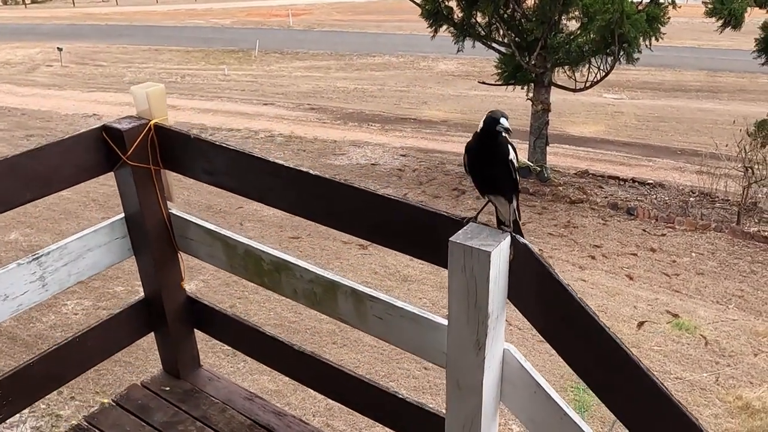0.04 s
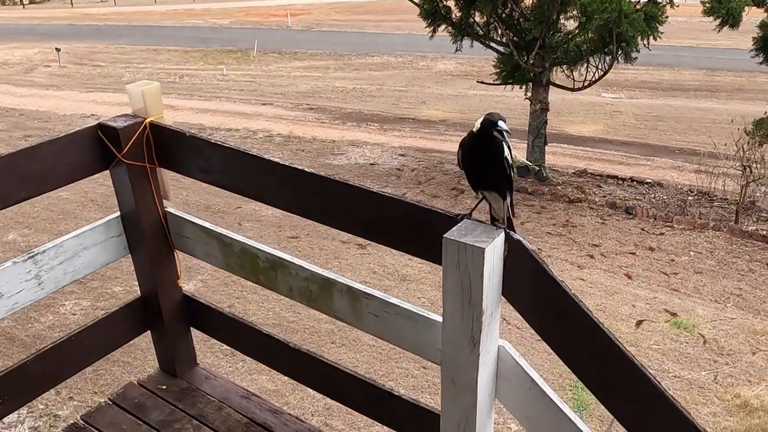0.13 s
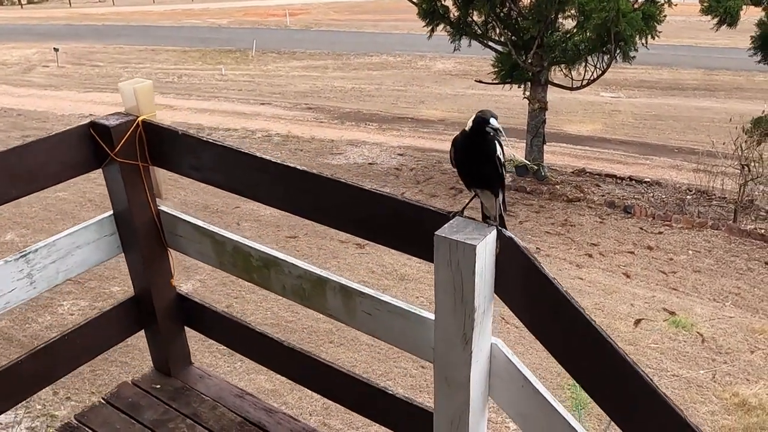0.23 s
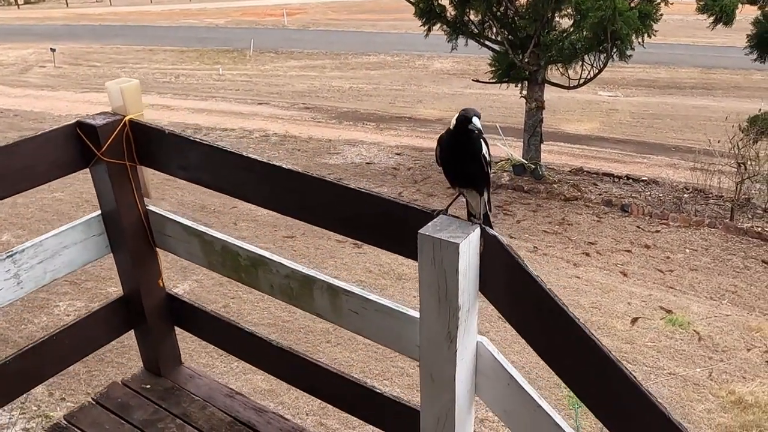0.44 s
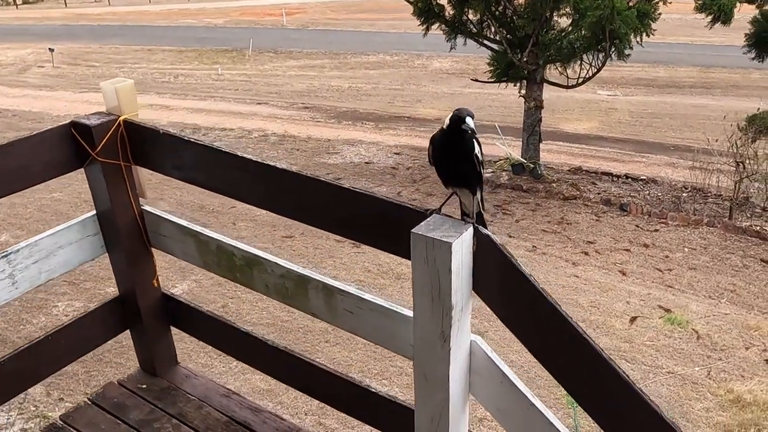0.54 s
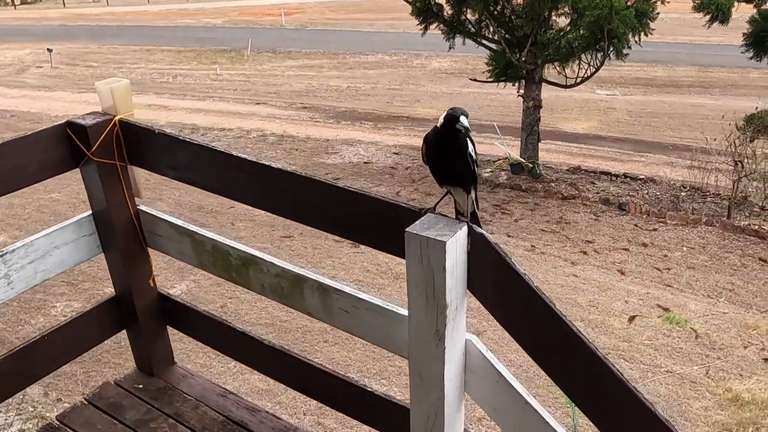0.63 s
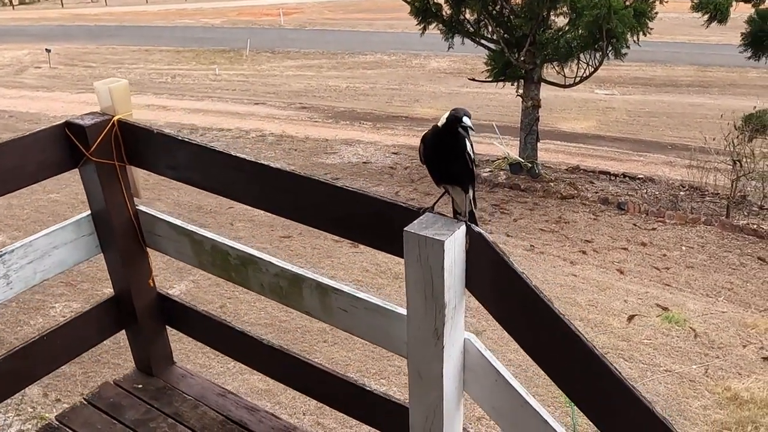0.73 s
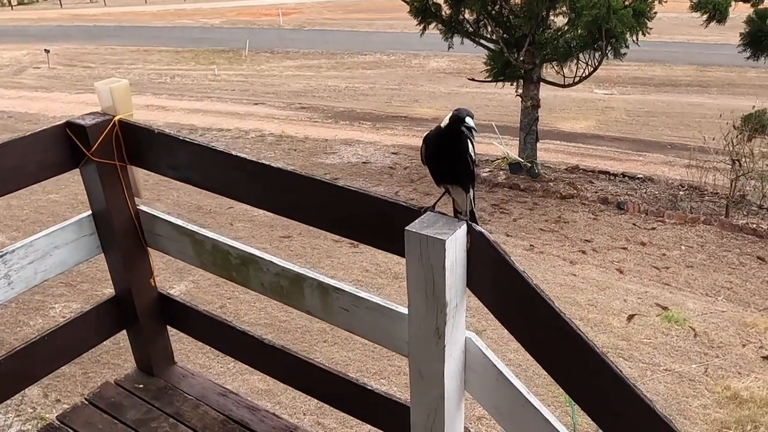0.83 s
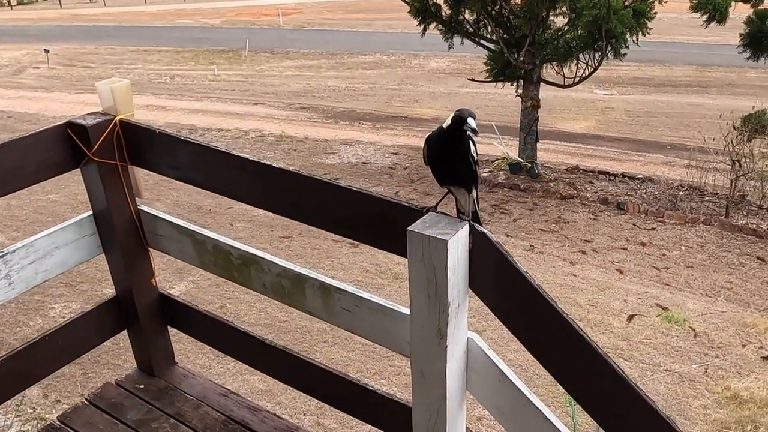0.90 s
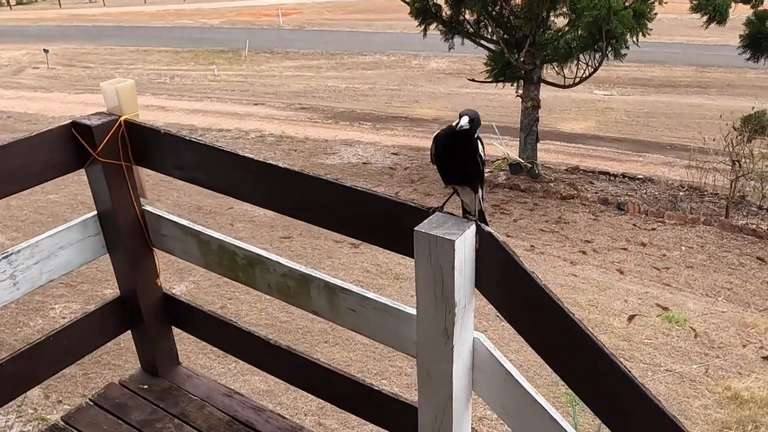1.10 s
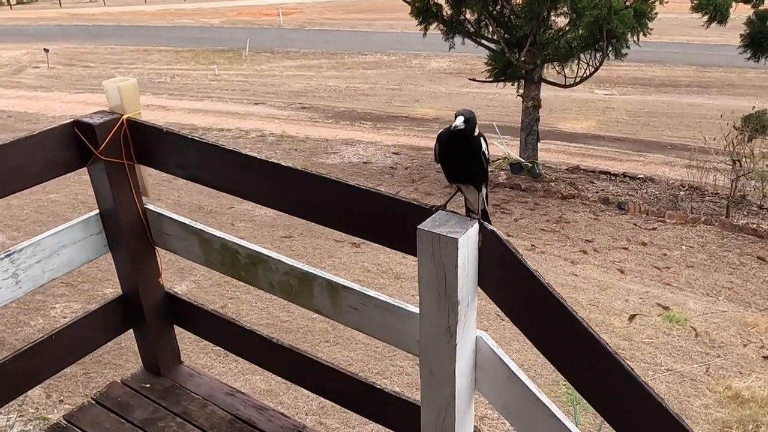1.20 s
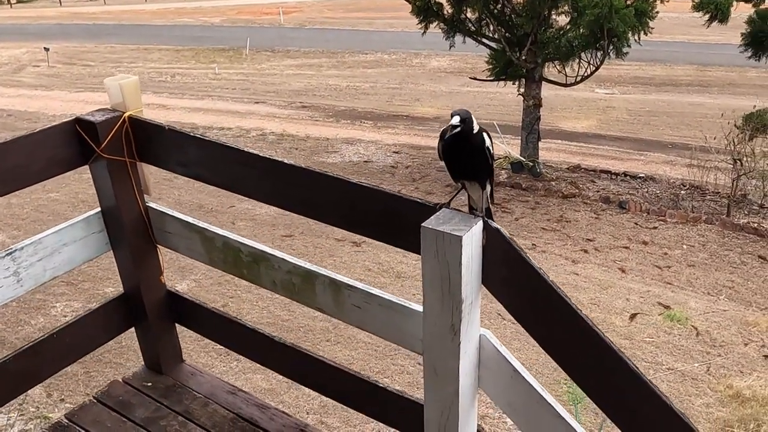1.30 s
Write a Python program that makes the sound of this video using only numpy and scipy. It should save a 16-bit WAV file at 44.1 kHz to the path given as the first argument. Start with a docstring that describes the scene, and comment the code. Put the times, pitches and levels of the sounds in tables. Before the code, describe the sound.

A magpie gives two loud, harsh, rattling squawks close by on an outdoor balcony

```python
"""On a balcony, a magpie on the rail squawks twice, close to a phone with a single microphone.
Its voice is a stack of harmonics that climbs in pitch and drops at the end; a slower rattle in
the syrinx (the bird's voice box) shakes its pitch and level. House wall and deck echo it.
Far birds are thin gliding sine whistles; the open-country air is coloured noise in flickering bands."""
import sys
import numpy as np
from scipy import signal
from scipy.fft import rfft, irfft, next_fast_len
from scipy.io import wavfile
from scipy.ndimage import uniform_filter1d

SR = 44100
rng = np.random.default_rng(int(sys.argv[2]) if len(sys.argv) > 2 else 0)


def store_wav(level_fs):
    """Save 16-bit WAV to argv[1]."""
    pcm = np.round(np.clip(np.atleast_2d(level_fs), -1, 1) * 32767)
    wavfile.write(sys.argv[1], SR, pcm.T.astype(np.int16))


N = 59535  # samples, 1.35 s


def undb(db):
    """Turn decibels into a plain multiplier."""
    return 10 ** (np.asarray(db) / 20)


def colour(x, points):
    """Shape a spectrum by (frequency [Hz], level [dB]) points, joined along a log-frequency axis."""
    size = next_fast_len(N + 4096)
    point_hz, point_db = np.array(points, float).T
    f = np.maximum(np.arange(size // 2 + 1) * SR / size, 1)
    gain = undb(np.interp(np.log(f), np.log(point_hz), point_db))
    return irfft(rfft(x, size) * gain, size)[..., :N]


def walk(rate):
    """Smooth random wander of spread 1: noise averaged twice over 1/rate seconds."""
    width = max(int(SR / rate), 2)
    wander = uniform_filter1d(uniform_filter1d(rng.standard_normal(N), width), width)
    return wander / wander.std()


def curve(points):
    """Join (time, value) points by straight lines, one value per sample."""
    return np.interp(np.arange(N) / SR, *np.array(points, float).T)


# Tone of the open air, before bands and final level: (frequency [Hz], relative level per Hz [dB])
AIR_TONE = [(25, -21.5), (60, -18), (170, -5.5), (350, -13.5), (520, -7.5), (750, -13.5), (1300, -12.5),
            (2200, -13), (3200, -14.5), (4300, -16), (5200, -15.5), (6500, -36), (8000, -48), (10000, -91),
            (14000, -100)]
# Ebb of the bass, relative to the other bands: (time [s], level [dB])
BASS_EBB = [(0, 13), (.2, 7.5), (.45, 7.5), (0.699, 6.5), (1, 3), (1.35, 4.5)]
AIR_DB, AIR_FLICKER_DB = -51, 1.2  # overall level; spread of each band's flicker


def air():
    """Distant traffic, leaves and chatter: noise in bands that flicker separately; the bass ebbs."""
    bed = colour(rng.standard_normal(N), AIR_TONE)
    edges_hz = [20, 90, 200, 450, 1000, 2000, 3200, 5000, 14000]
    ebb = curve(BASS_EBB)
    out = 0
    for k, band in enumerate(zip(edges_hz, edges_hz[1:])):
        db = AIR_FLICKER_DB * walk(7.3) + ebb * (k < 3)  # only the three lowest bands ebb
        band_filter = signal.butter(2, band, "band", fs=SR, output="sos")
        out = out + undb(db) * signal.sosfilt(band_filter, bed)
    return out * undb(AIR_DB) / out.std()


# Far bird calls, levels before wavering and echo:
# (start [s], length [s], first pitch [Hz], last pitch [Hz], level [dB])
WHISTLES = [(0.036, 0.089, 2070, 2136, -46.5), (0.078, 0.049, 5030, 5400, -66), (.04, .07, 3600, 4600, -62),
            (0.11, 0.19, 2790, 3370, -50.5), (0.171, 0.086, 4350, 4580, -42.5),
            (0.44, 0.066, 290, 354, -46), (0.59, 0.053, 3400, 3100, -55.5), (.745, 0.086, 2040, 2200, -55),
            (.53, 0.094, 4730, 4650, -55), (.54, 0.042, 3200, 3540, -48), (.63, 0.085, 4700, 4470, -60.5),
            (1.21, 0.031, 3140, 3230, -47.5), (1.26, .085, 4700, 4300, -50),
            (1.253, 0.062, 3950, 4140, -52.5), (1.282, 0.025, 6300, 5650, -58.5)]


def far_birds():
    """Each whistle is one sine that glides fast, then slower, wavering a little in pitch and level."""
    out, t = np.zeros(N), np.arange(N) / SR
    for start, length, from_hz, to_hz, db in WHISTLES:
        progress = np.clip((t - start) / length, 0, 1)
        glide = from_hz + (to_hz - from_hz) * np.sin(progress * np.pi / 2)
        hz = glide * (1 + .012 * walk(150))
        swell = np.sin(np.pi * progress) ** .6
        tone = np.sin(2 * np.pi * np.cumsum(hz) / SR)
        out += undb(db + 2.5 * walk(90)) * swell * tone
    return out


# Echoes off deck and walls, compared with the direct sound: (delay [s], level [dB])
ECHOES = [(.0031, -12.5), (.0087, -12.5), (.0145, -37.5), (.028, -19.5), (.047, -16)]
# Time to fade by 60 dB [s], and level compared with the direct sound [dB]
ROOM_T60_S, ROOM_DB = 0.26, -8
YARD_T60_S, YARD_DB = 0.49, -16


def balcony(x):
    """Delayed copies make the single echoes; fading noise makes a short dense tail and a faint long one."""
    t = np.arange(SR) / SR
    room = 0
    for t60, db in ((ROOM_T60_S, ROOM_DB), (YARD_T60_S, YARD_DB)):
        fall = undb(-60 * t / t60) * (1 - np.exp(-t / 0.0067))  # builds up gently, then fades
        fall = fall / np.sqrt(np.sum(fall ** 2))
        room = room + undb(db) * fall * rng.standard_normal(SR)
    room[0] = 1  # the direct sound
    for delay, db in ECHOES:
        room[int(delay * SR)] += undb(db)
    return signal.fftconvolve(x, room)[:N]


# How the voice moves, one list per squawk:
# (time [s], pitch [Hz], rattle rate [Hz], rattle pitch swing [Hz], hoarseness [0-1])
SQUAWKS = [
    [(.199, 610, 150, 30, .5), (.215, 690, 150, 32, .45), (.23, 740, 145, 24, .4), (.25, 779, 145, 22, .35),
     (.285, 803, 135, 18, .2), (.303, 812, 135, 40, .5), (.318, 835, 128, 24, .15),
     (.338, 853, 124, 40, .1), (.365, 862, 115, 55, .15), (.382, 848, 104, 60, .35),
     (.405, 810, 105, 65, .6), (.44, 630, 105, 50, .6)],
    [(.798, 600, 150, 35, .5), (.815, 700, 150, 35, .35), (.83, 742, 145, 22, .35), (.85, 780, 140, 20, .3),
     (.878, 814, 140, 22, .3), (.892, 840, 135, 40, .35), (.908, 864, 132, 42, .15),
     (.93, 892, 126, 62, .25), (.95, 905, 120, 68, .1), (.975, 912, 120, 70, .06),
     (.998, 904, 110, 70, .12), (1.014, 885, 100, 70, .5), (1.03, 800, 100, 60, .6),
     (1.055, 640, 100, 50, .6)],
]
# Loudness of the voice before the overall colour, one list per squawk: (time [s], level [dB])
LOUDNESS = [
    [(.199, -48), (.212, -24), (.228, -17), (.26, -16.5), (.3, -14), (.335, -15.5), (.37, -11.5),
     (.398, -18), (.418, -24.5), (.432, -29.5), (.44, -77)],
    [(.798, -47), (.812, -28), (.83, -19.5), (.86, -17), (.895, -14), (.925, -13), (.96, -12.5),
     (.998, -13.5), (1.018, -14), (1.04, -27), (1.055, -40)],
]
# Strength of the first harmonics before the overall colour, the last serving all higher ones: (level [dB])
HARMONICS_DB = [0.5, 8, 6, -3, 5, -4, 1.5, 0.5, 1.5, -2, -24, 2]
# Change of each harmonic once the rattle is at full swing: (level change [dB])
RATTLED_DB = [-7.5, -0.5, -3, 6.5, 1, 1, 3.5, -28, -24, 9, -2, -3]
# Hiss of air in the voice, before the overall colour: (frequency [Hz], level [dB])
BREATH = [(500, -34), (2500, -24), (3800, -10), (5200, -4), (14000, -2)]
# Overall colour of the squawks as heard, with a steep loss above about 6.5 kHz:
# (frequency [Hz], level [dB])
SQUAWK_COLOUR = [(300, -20), (550, -5), (880, -8.5), (1050, -2), (1300, -10), (1700, -10), (2100, -4),
                 (2500, -2), (2950, -8), (3200, -13), (3800, -8.5), (4300, -15), (4800, -10.5), (5600, -11),
                 (6400, -13.5), (6800, -21), (7100, -21), (7700, -23.5), (8400, -36), (9000, -60.5),
                 (10000, -44), (12500, -42.5), (14200, -60)]
FULL_SWING_HZ = 71
RATTLE_DEPTH, RATTLE_LAG = 0.0034, 2.63  # level swing per Hz of pitch swing; radians behind the pitch
RATTLE_KINK, KINK_LAG = 0.39, 0.33  # share and phase [radians] of the rattle's own second harmonic
BRIGHT_DEPTH, BRIGHT_LAG = 0.0028, 0.21  # flare growth per harmonic and Hz of swing; lag in radians
DULLING = .045  # dB lost per harmonic above the third for each dB under full voice
JITTER_HZ, JITTER_RATE, SHIMMER_DB = 26, 500, 2  # pitch and level roughness at full hoarseness; rate in Hz


def squawk(rows, loudness):
    """Harmonics of a shaken pitch and hoarse breath are added, then given one overall colour."""
    t = np.arange(N) / SR
    rows = np.array(rows, float)
    hz, rate, swing, hoarse = (curve(rows[:, [0, k]]) for k in range(1, 5))
    db = curve(loudness)

    # hoarseness makes the rattle uneven
    rattle = 2 * np.pi * np.cumsum(rate * (1 + .22 * hoarse * walk(70))) / SR
    shake = swing * (np.cos(rattle) + RATTLE_KINK * np.cos(2 * rattle - KINK_LAG))
    jitter = JITTER_HZ * hoarse * walk(JITTER_RATE)
    phase = 2 * np.pi * np.cumsum(hz + shake + jitter) / SR
    shimmer = undb(SHIMMER_DB * hoarse * walk(450))
    throb = np.exp(RATTLE_DEPTH * swing * np.cos(rattle - RATTLE_LAG)) * shimmer

    # upper harmonics flare near the top of each pitch swing
    order = np.arange(1, 20)[:, None]
    flare_growth = BRIGHT_DEPTH * np.minimum(order - 1, 4) * swing
    flare = np.exp(flare_growth * (np.cos(rattle - BRIGHT_LAG) - .5))
    row = np.minimum(order, len(HARMONICS_DB)) - 1
    rattled = np.array(RATTLED_DB)[row] * (swing / FULL_SWING_HZ) ** 2
    dulling = DULLING * (order - 3) * (db - db.max())
    strength = undb(np.array(HARMONICS_DB)[row] + rattled + dulling)
    harmonics = strength * flare * np.cos(order * phase - 0.29 * order ** 2)
    stack = throb * harmonics.sum(axis=0)

    # the hiss pulses once per voice cycle and grows with hoarseness
    hiss = colour(rng.standard_normal(N), BREATH)
    breath = (1 + 3 * hoarse) * throb * flare[-1] * hiss * (1 + np.cos(phase))
    sounding = (t > rows[0, 0]) & (t < rows[-1, 0])
    return colour((stack + breath) * undb(db) * sounding, SQUAWK_COLOUR)


def scene():
    """Magpie and far birds share the balcony's echoes; the air is added without them."""
    magpie = sum(squawk(rows, loudness) for rows, loudness in zip(SQUAWKS, LOUDNESS))
    mono = balcony(magpie + far_birds()) + air()
    return np.array([mono, mono])


def record(dry):
    """The phone cuts the top: a steep low-pass filter at 14250 Hz."""
    top_cut = signal.ellip(10, .2, 80, 14250, fs=SR, output="sos")
    return signal.sosfilt(top_cut, dry)


dry = scene()
out = record(dry)
store_wav(out)
```